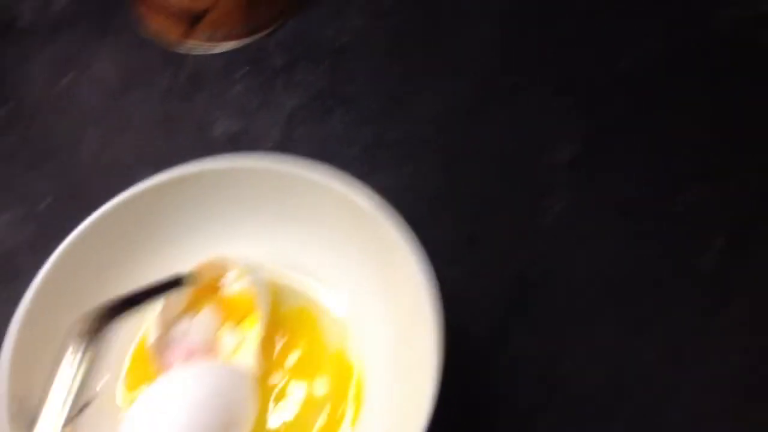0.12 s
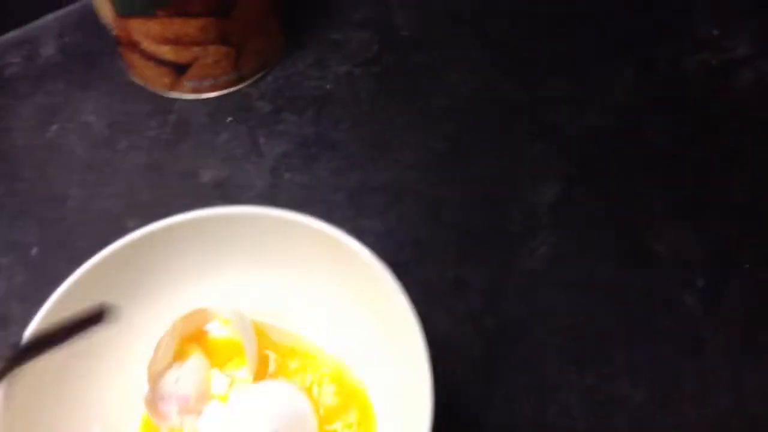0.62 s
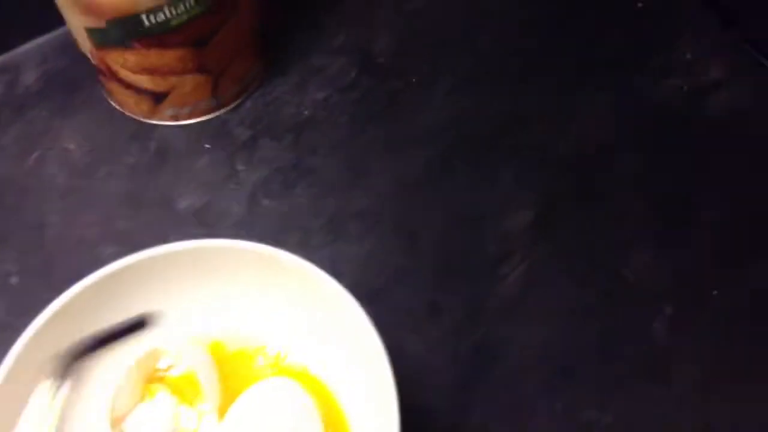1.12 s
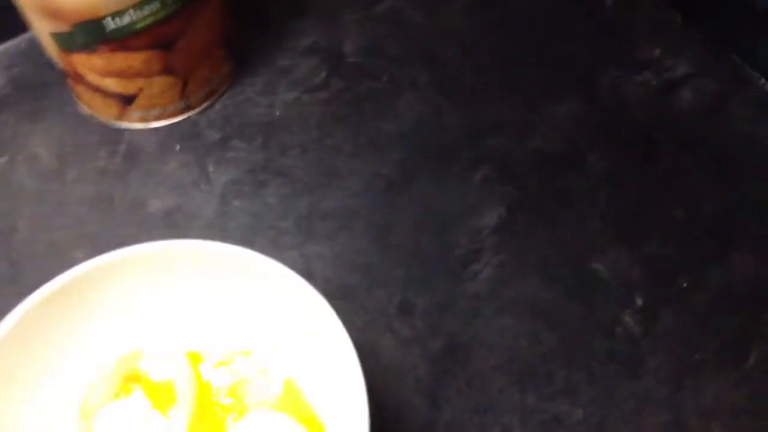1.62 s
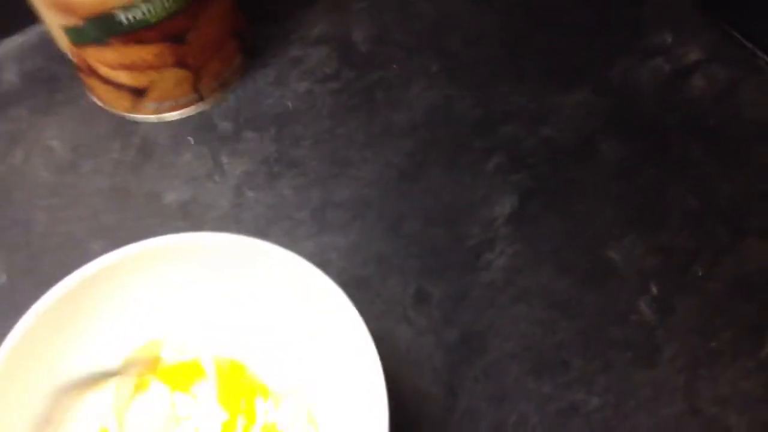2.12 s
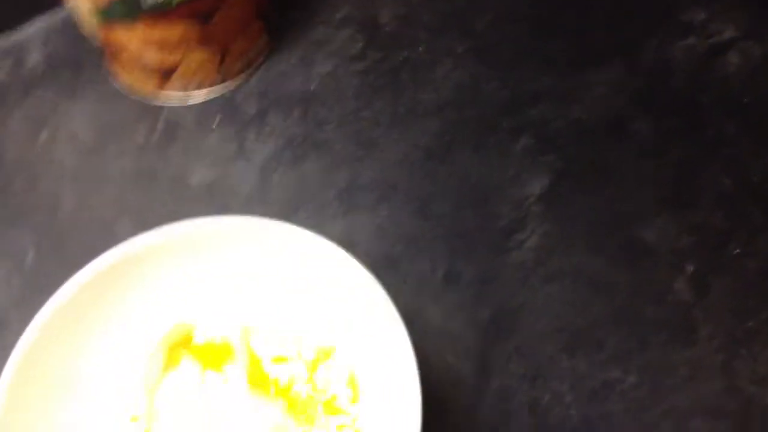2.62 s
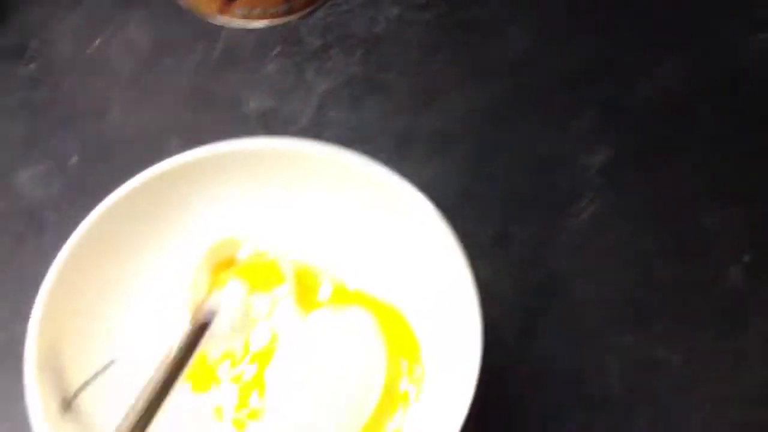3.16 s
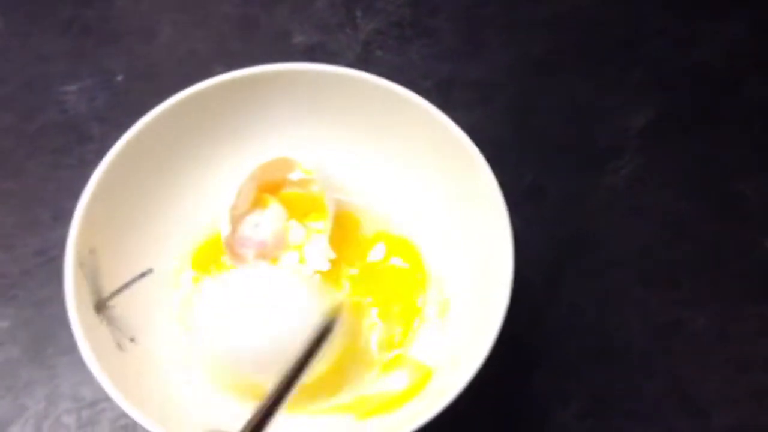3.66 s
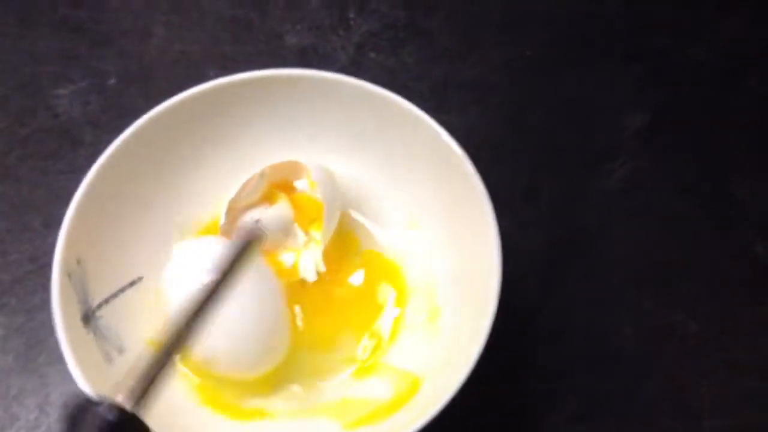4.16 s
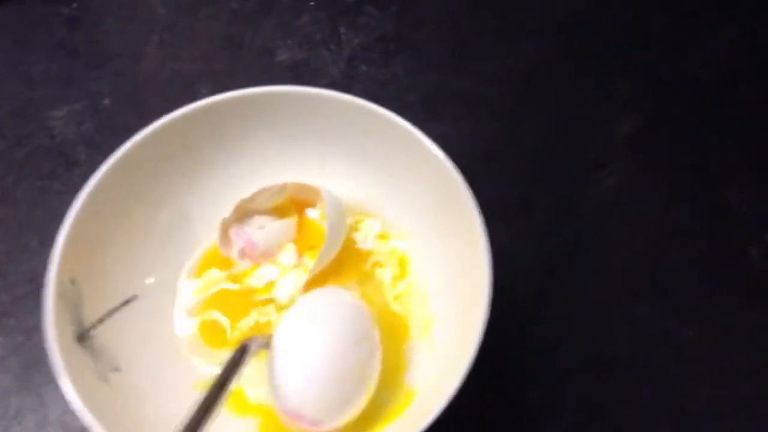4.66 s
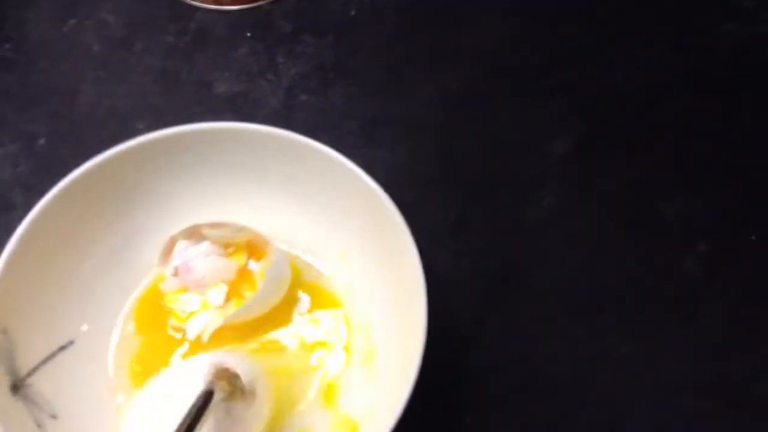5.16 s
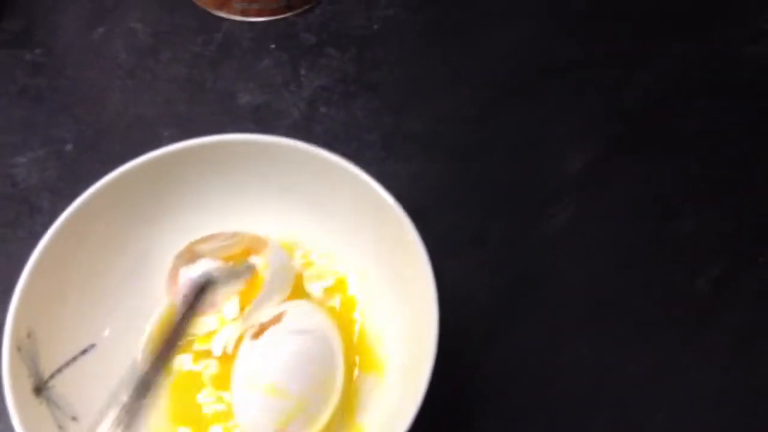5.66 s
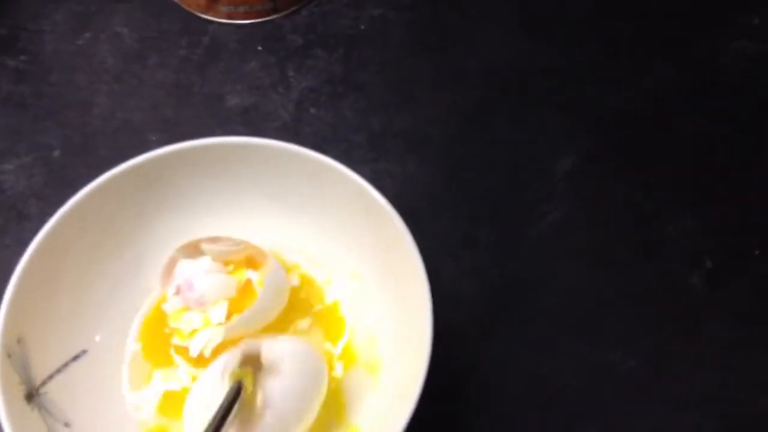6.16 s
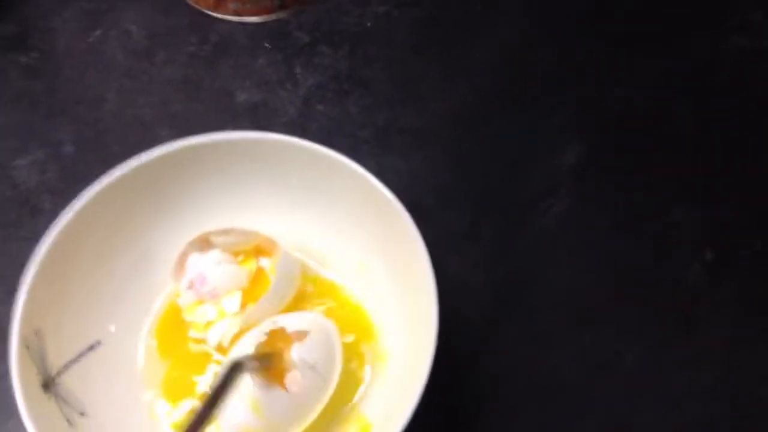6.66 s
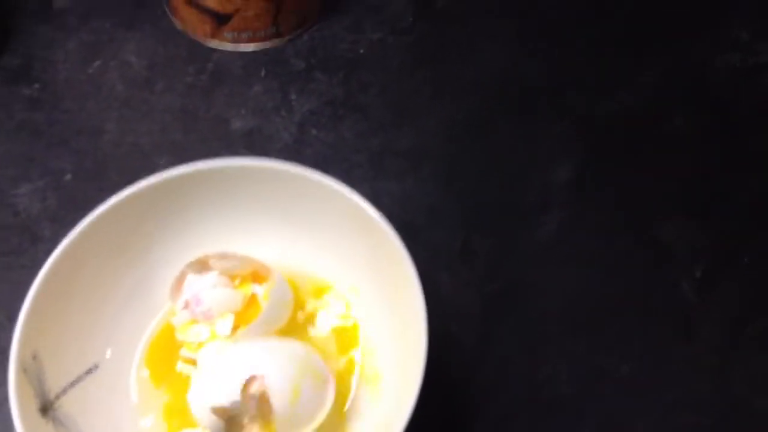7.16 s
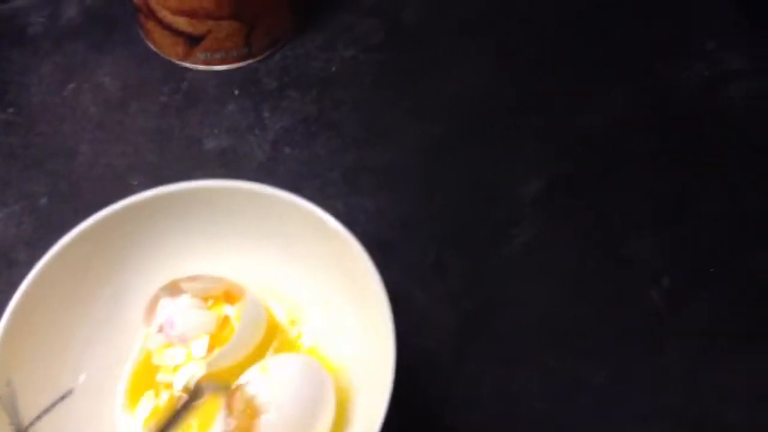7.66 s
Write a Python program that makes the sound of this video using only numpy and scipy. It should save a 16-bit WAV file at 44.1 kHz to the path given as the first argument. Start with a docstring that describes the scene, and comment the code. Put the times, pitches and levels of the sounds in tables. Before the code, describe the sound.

Irregular crisp taps of steel on cracked eggshell, dull ceramic bowl knocks, small wet crackly scrapes and a brief squeak, in a lightly echoing kitchen.

```python
"""Egg jabbed in a ceramic bowl

Kitchen counter, small microphone close to the bowl. A steel tool jabs at an egg: clicks and noise
bursts make the cracks, dying sines the shell, bowl, counter and steel pings, gliding sines the squeaks.
Grainy noise through a moving resonance makes the slides, with a rumble from noise in the counter modes.
Echoes and decaying taps make the hard-walled kitchen, over a steady hush of filtered noise.
"""
import sys
import numpy as np
from scipy import signal
from scipy.fft import rfft, irfft
from scipy.io import wavfile

SR = 44100
rng = np.random.default_rng(int(sys.argv[2]) if len(sys.argv) > 2 else 0)


def wav_record(signal):
    """Record a signal, one row per channel, as 16-bit PCM in the file named by sys.argv[1]."""
    frames = np.transpose(np.atleast_2d(signal))
    bounded = np.clip(frames, -1, 1)
    # unit amplitude maps onto the largest positive 16-bit level
    quanta = np.round(bounded * 32767).astype(np.int16)
    wavfile.write(sys.argv[1], SR, quanta)


def undo_db(level):
    """Turn decibels back into plain size, where 20 dB means ten times bigger."""
    steps = np.asarray(level, float) / 20
    return 10 ** steps


N = 343539  # samples

# Tool on shell: time t/s, crack level/dB, counter thud level re crack/dB, shell pitch f/Hz,
# treble level re crack/dB
JABS = [(0.434, -3, -18.5, 3530, -15), (0.915, -14, -7.5, 3690, -2.5), (.955, -32, -30, 5400, -3.5),
        (1.3, -10, -15, 3400, -7), (1.617, -1, -21.5, 2000, -12), (1.648, -18.5, -21, 3850, -11),
        (1.812, -33, -0.5, 1250, -15), (1.828, -23.5, -33.5, 7360, -18), (1.872, -31, -32, 2820, -25),
        (1.966, -3.5, -23.5, 5190, -13), (2.154, -31.5, -32, 3700, -24), (2.31, -4.5, -21.5, 7240, -14.5),
        (2.344, -20, -15, 3670, -6.5), (2.401, -37, 3.5, 1010, -23), (2.51, -22.5, -10.5, 1070, -21),
        (2.568, -25.5, -23.5, 2050, -36), (2.688, -11, -23, 3330, -7), (3.014, -6.5, -30.5, 1013, -16.5),
        (3.341, -4, -31.5, 996, -11.5), (3.674, -4.5, -33, 2060, -17), (3.834, -26.5, -23.5, 930, -15),
        (4.008, -5.5, -23.5, 3120, -19), (4.039, -34, -33, 3720, -15), (4.163, -27.5, -32, 4740, -3.5),
        (4.188, -27.5, -6.5, 1160, -15.5), (4.634, -8.5, -25.5, 2510, -14.5),
        (5.126, -12.5, -15.5, 2070, -8), (5.158, -22.5, -23, 2000, -2), (5.227, -34.5, -25, 3400, 0),
        (5.27, -34, -35.5, 4500, -19), (5.303, -33.5, -26, 6550, 5.5), (5.435, -6, -19.5, 1220, -12),
        (5.655, -54.5, -30, 7000, 6), (5.799, -10.5, -25, 6640, -0.5), (5.847, -22, -17, 5000, -4),
        (5.993, -35.5, -18.5, 2050, -9), (6.144, -22.5, -16.5, 3330, 3.5), (6.168, -37, -33, 7500, 0),
        (6.179, -28, -26, 4000, -14), (6.271, -41, -30, 1100, 2.5), (6.31, -45, -18, 1160, 11),
        (6.382, -28.5, -26, 3010, -13.5), (6.522, -15, -28, 1720, -4), (6.711, -25.5, -24, 950, -12),
        (6.853, -18.5, -36, 4550, -5), (6.888, -22, -23, 2000, -13), (7.043, -37, -35, 3300, -14),
        (7.22, -32, -52, 4160, -3), (7.266, -38, -5, 6200, -2), (7.285, -10.5, -48, 4810, -6.5),
        (7.293, -27.5, -15.5, 4940, -9.5), (7.373, -27.5, -57, 1930, 3), (7.384, -24.5, -53, 1850, -5.5),
        (7.418, -40.5, -50, 1970, 12), (7.54, -10, -25.5, 2610, -9.5), (7.587, -16, -51, 5520, -17)]
# Egg thrown against the bowl: time t/s, crack level/dB, then levels re crack/dB of
# counter thud, bowl knock, rim ring
KNOCKS = [(2.801, -24, -20, -17, -50.5), (3.058, 2.5, -29.5, -20, -51), (3.546, -52.5, -2, -9, -28),
          (3.723, -3.5, -27.5, -17.5, -49.5), (4.317, -7, -15, -15, -57),
          (4.329, -8.5, -26.5, -28.5, -51.5), (4.665, 2.5, -30.5, -21.5, -54.5),
          (5.492, 3, -29.5, -20.5, -48), (5.859, -8.5, -22, -12, -38), (6.192, -8, -20, -19, -59),
          (6.206, -5.5, -29, -22, -75), (6.574, -4, -23, -16, -46.5), (6.902, -0.5, -24.5, -18.5, -49.5),
          (7.615, 3.5, -28, -20.5, -53)]
# Egg and shell bits slide: start t/s, length t/s, crackle level/dB, rumble level/dB, resonance f/Hz
SLIDES = [(-.01, 0.079, -37, -39.5, 3700), (.05, .085, -35.5, -45, 5460),
          (0.409, 0.059, -57.5, -61.5, 3700), (0.615, 0.035, -42.5, -40, 3740),
          (0.647, 0.042, -39, -43.5, 2000), (0.686, 0.09, -56.5, -45.5, 3800),
          (1.047, 0.56, -64, -77, 3000), (1.816, 0.069, -44, -51, 5300), (2.097, 0.041, -59, -46, 3060),
          (2.358, 0.27, -52.5, -44, 5200), (2.516, 0.039, -38, -31, 4930), (2.56, 0.027, -41, -46, 2400),
          (2.612, 0.017, -49.5, -62.5, 2000), (2.715, .03, -25.5, -51, 5300),
          (2.748, 0.024, -23, -33, 3920), (2.799, 0.042, -44.5, -50, 2800), (3.352, 0.023, -44, -31, 4150),
          (3.386, 0.031, -16, -42, 2790), (3.401, 0.034, -34, -43, 3860), (3.53, 0.038, -56.5, -59.5, 2130),
          (3.854, .1, -45.5, -66, 2100), (4.007, 0.073, -27, -38.5, 3400), (4.199, 0.13, -41, -65, 4200),
          (4.5, 0.15, -51.5, -43, 2150), (5.137, 0.065, -29.5, -30, 6500), (5.23, 0.1, -45, -59, 3500),
          (5.313, 0.085, -40.5, -49, 8100), (5.821, 0.054, -30, -35.5, 5000),
          (5.899, 0.093, -43, -53, 7500), (6.137, 0.087, -30.5, -46, 6540), (6.214, 0.13, -57, -49, 5500),
          (6.543, 0.032, -55, -43, 7200), (6.86, 0.1, -25.5, -34.5, 2410), (6.972, 0.18, -41, -60, 2100),
          (7.23, 0.067, -35.5, -67, 4850), (7.298, 0.05, -51, -59, 4600), (7.379, 0.069, -32, -72, 6540),
          (7.554, 0.035, -36, -60, 4580)]
# Steel tip on the bowl: t/s, level/dB
PINGS = [(3.059, -26.5), (3.724, -27), (4.666, -21), (5.492, -21.5), (5.858, -35), (6.191, -28),
         (6.576, -31.5)]
# Wet squeaks of steel on shell: t/s, level/dB, first f/Hz, last f/Hz, t60/s
SQUEAKS = [(7.373, -10.5, 2090, 1830, 0.031), (7.386, -16.5, 1951, 1680, 0.028),
           (7.399, -32, 1820, 1660, 0.04), (7.419, -24, 2000, 1900, 0.029)]
# Rim ring after a jab, read between points: t/s, level re crack/dB
RIM_REACH = [(.4, -66), (1.3, -45.5), (2, -63), (3.35, -49), (5.1, -57.5), (5.8, -42.5), (6.5, -79),
             (7.5, -61.5)]
# Shell ring after a jab, read between points: t/s, level re crack/dB
SHELL_RING = [(.43, -19), (.9, -10), (1.3, -14.5), (1.62, -24.5), (3.0, -20.5), (7.2, -20), (7.28, -7.5),
              (7.4, -5.5), (7.54, -15.5)]

# Modes of the counter, the yolk-damped bowl, the bowl's rim and the steel tip: f/Hz, level/dB, t60/s
COUNTER_MODES = [(159.4, -0.5, 0.19), (203.6, -2.5, 0.11), (218.3, -7.5, 0.12), (262, -13, 0.25),
                 (313.6, -6.5, 0.099), (341.5, 6.5, 0.062), (392, 1.5, 0.09), (438, -1, 0.18),
                 (480, -17.5, 0.028), (651, -7, 0.052), (727, -15, 0.15)]
DAMPED_BOWL_MODES = [(1050, -20.5, 0.019), (1004, -4, 0.1), (1023, -0.5, 0.096), (1162.5, 9, .035),
                     (1220, -0.5, 0.11), (1309, -3, 0.11), (1250, -2, 0.088), (2000, 13, .012),
                     (3150, 9, 0.012), (3400, -27.5, 0.019), (6750, 1, .01)]
RIM_MODES = [(938, -2, .65), (941, -12, .5), (2053, -1, .65), (2057.5, -8, .5), (3375, -16, .3)]
STEEL_MODES = [(11490, 0, .045), (11620, -6, .02)]

# Spectra of crack, its treble, scraping shell and hush: f/Hz, relative density level/dB per Hz
CRACK_SPECTRUM = [(180, -25.5), (300, -7.5), (1230, 4.5), (1620, -6), (3530, 3), (4530, 0), (7000, -2.5),
                  (9100, -25.5), (15400, -120)]
TREBLE_SPECTRUM = [(4000, -11), (6000, -2.5), (9000, -3), (13000, -5.5), (15500, -17), (18000, -26.5)]
SCRAPE_SPECTRUM = [(410, -24.5), (700, -3.5), (1500, 2), (2100, 4), (2330, 1.5), (9480, -4.5),
                   (14800, -12.5), (16000, -36)]
HUSH_SPECTRUM = [(24, -80), (40, -33.5), (189, 1), (262, -13.5), (733, -14.5), (942, -15), (3380, -19.5),
                 (12800, -27), (14100, -26.5), (16000, -44.5)]

# Near reflections, re the direct sound: delay t/s, level/dB
ECHOES = [(.0011, -25), (.0022, -22), (0.0139, -23.5), (0.021, -32), (.031, -28.5), (0.04, -36.5)]
# Decay of the kitchen by band: f/Hz, t60/s
KITCHEN_DECAY = [(100, 0.14), (300, 0.43), (1000, 0.29), (3000, 0.22), (7000, 0.22), (14000, 0.16)]

BLOW_DELAY_S = 0.0015  # delay from the listed time to the blow
BOUNCE_S, BOUNCE_DB = 0.0088, -15  # the egg lands a second time after a knock
KNOCK_TREBLE_DB = -16  # re crack
SLIDE_RISE_S = 0.01  # fade at either end of a slide
SLIDE_FADE_DB, RUMBLE_FADE_DB = -13.5, -16  # a slide slows: change in level by its end
STUTTER_DB, STUTTER_S = 2.5, 0.015  # rms swing and smoothing window
KITCHEN_DB = -10.5
LATE_DB, LATE_SLOWER = -16.5, 2.6  # the rooms next door die more slowly
HUSH_DB = -70
MIC_LOW_HZ, MIC_TOP_HZ = 130, 15600


def jabs(near, bodies):
    """Steel on shell: each blow excites the cracked shell's short modes."""
    for s, db, thud_db, hz, treble_db in JABS:
        shell = ring(shell_modes(hz), 0.1, spread_db=0, rise=0.0016, chatter=0.15)
        shell_db = np.interp(s, *np.transpose(SHELL_RING))
        rim_db = np.interp(s, *np.transpose(RIM_REACH))
        blow(s, db, thud_db, treble_db, rim_db, undo_db(shell_db) * shell, near, bodies)


def knocks(near, bodies):
    """Egg on bowl: each blow excites the yolk-damped bowl, and the egg then bounces once."""
    for s, db, thud_db, knock_db, rim_db in KNOCKS:
        bowl = ring(DAMPED_BOWL_MODES, 0.2, spread_db=1.5, rise=0.00073, detune=0.0018, chatter=0.14)
        bowl = undo_db(knock_db) * bowl
        blow(s, db, thud_db, KNOCK_TREBLE_DB, rim_db, bowl, near, bodies)
        crack = 0.66 * burst(CRACK_SPECTRUM, snap=0.0015, tail=0.0013, tail_db=-18, click_db=0.5)
        add(near, s + BLOW_DELAY_S + BOUNCE_S, undo_db(db + BOUNCE_DB) * (crack + bowl[:4096]))


def blow(s, db, thud_db, treble_db, rim_db, body, near, bodies):
    """Crack and body go to the air; counter and rim ring on by themselves."""
    s = s + BLOW_DELAY_S
    crack = burst(CRACK_SPECTRUM, snap=0.00065, tail=0.0051, tail_db=-11, click_db=8.5)
    treble = burst(TREBLE_SPECTRUM, snap=0.00043, tail=0.0066, tail_db=-10, click_db=0)
    thud = ring(COUNTER_MODES, 0.54, spread_db=2.5, rise=0.0044, detune=0.016, chatter=0.031)
    rim = ring(RIM_MODES, 0.93, spread_db=0, rise=0.011)
    add(near, s, undo_db(db) * 0.41 * crack)
    add(near, s, undo_db(db + treble_db) * 2.67 * treble)
    add(near, s, undo_db(db) * body)
    add(bodies, s, undo_db(db + thud_db) * thud)
    add(bodies, s, undo_db(db + rim_db) * rim)


def shell_modes(hz, count=5):
    """A cracked shell has a cluster of close, short modes, and a hollow note near 3.5 kHz."""
    steps = np.linspace(-1, 1, num=count) + 0.11 * rng.standard_normal((2, count))
    cluster = [(f, 0, 0.008) for f in hz * (1 + 0.07 * steps[0])]
    hollow = [(f, -15, 0.01) for f in 3450 * (1 + 0.09 * steps[1])]
    return cluster + hollow


def burst(spectrum, snap, tail, tail_db, click_db):
    """A clean click, a snap of noise and a short crumble; snap and tail are 1/e times in s."""
    t = np.arange(4096) / SR
    shape = np.exp(-t / snap) + undo_db(tail_db) * np.exp(-t / tail)
    shape = shape * np.minimum(t / 0.00023, 1)
    noise = evened(coloured(rng.standard_normal(len(t)), spectrum))
    return undo_db(click_db) * click(spectrum) + noise * shape


def click(spectrum):
    """The shortest causal pulse with this spectrum, peak 1: minimum phase by the folded cepstrum."""
    db = np.maximum(read(spectrum, np.fft.rfftfreq(4096, 1 / SR)), -50)
    cepstrum = irfft(np.log(undo_db(db)))
    cepstrum[1:2048] *= 2
    cepstrum[2049:] = 0
    pulse = irfft(np.exp(rfft(cepstrum)))
    return pulse / abs(pulse).max()


def ring(modes, seconds, spread_db, rise, detune=0.0, chatter=0.0):
    """Dying sines; each blow sets signs and may vary strengths and pitches and chatter a little."""
    hz, db, t60 = np.transpose(modes)[:, :, None]
    t = np.arange(round(seconds * SR)) / SR
    draw = rng.standard_normal((3, len(modes), 1))  # for sign, strength and pitch
    sines = np.sin(2 * np.pi * hz * (1 + detune * draw[2]) * t)
    strength = np.sign(draw[0]) * undo_db(db + spread_db * draw[1] - 60 * t / t60)
    rung = (strength * sines).sum(0) * (1 - np.exp(-t / rise))
    contact = chatter * rng.standard_normal(900) * np.exp(-np.arange(900) / SR / 0.0042)
    contact[0] = 1
    return evened(signal.oaconvolve(rung, contact), count=600)


def pings(near):
    """The steel tip meets the bowl and rings high and short."""
    for s, db in PINGS:
        add(near, s, undo_db(db) * ring(STEEL_MODES, 0.2, spread_db=1.5, rise=0.00043))


def squeaks(near):
    """Wet steel on shell: a dying sine whose pitch sags as the tip slows."""
    t = np.arange(3000) / SR
    for s, db, first_hz, last_hz, t60 in SQUEAKS:
        hz = last_hz + (first_hz - last_hz) * np.exp(-t / 0.015)
        tone = np.sin(2 * np.pi * np.cumsum(hz) / SR)
        add(near, s, undo_db(db - 60 * t / t60) * np.minimum(t / 0.0035, 1) * tone)


def slides():
    """Wet shell bits crackle through a moving resonance; the rolling egg shakes the counter modes."""
    t = np.arange(N) / SR
    # the wet grip catches and lets go
    swing = signal.oaconvolve(rng.standard_normal(N), np.hanning(STUTTER_S * SR), "same")
    stutter = undo_db(STUTTER_DB * evened(swing))
    crackle_gain, rumble_gain = np.zeros((2, N))
    for s, length, crackle_db, rumble_db, _ in SLIDES:
        done = (t - s) / length
        moving = np.clip(np.minimum(t - s, s + length - t) / SLIDE_RISE_S, 0, 1)
        crackle_gain += moving * undo_db(crackle_db + SLIDE_FADE_DB * done ** 2)
        rumble_gain += moving * undo_db(rumble_db + RUMBLE_FADE_DB * done ** 2)
    shorter = [(hz, db, t60 * 0.72) for hz, db, t60 in COUNTER_MODES]
    counter = ring(shorter, 0.3, spread_db=2, rise=0.0038)
    shaking = rng.standard_normal(N) * rumble_gain * stutter
    rumble = signal.oaconvolve(shaking, counter / np.linalg.norm(counter))[:N]
    return scraping() * crackle_gain * stutter, rumble


def scraping(grains_per_s=2500, grain_db=2.5, hiss=0.7, peak_db=9, peak_octaves=0.12):
    """Random grains and hiss, boosted around the pitch of the slide that started last."""
    sizes = undo_db(grain_db * np.minimum(rng.exponential(1, N), 5))
    grains = (rng.random(N) < grains_per_s / SR) * sizes * rng.standard_normal(N)
    rough = coloured(evened(grains) + hiss * rng.standard_normal(N), SCRAPE_SPECTRUM)
    start, _, _, _, peak_hz = np.transpose(SLIDES)
    hz, frame_s, z = signal.stft(rough, SR, nperseg=256)
    latest = np.maximum(np.searchsorted(start, frame_s) - 1, 0)
    off = np.log2((hz[:, None] + 1) / peak_hz[latest]) / peak_octaves
    boosted = z * undo_db(peak_db * np.exp(-off ** 2))
    return evened(signal.istft(boosted, SR, nperseg=256)[1][:N])


def kitchen(x):
    """A few near echoes, then sparse taps whose bands die at their own speeds."""
    early = np.zeros(SR // 10)
    early[0] = 1  # direct sound
    for s, db in ECHOES:
        early[round(s * SR)] = undo_db(db)
    out = signal.oaconvolve(x, early)[:N]
    # three tails take turns, so the reverberation varies from blow to blow
    for k in range(3):
        turn = np.sqrt(2 / 3) * np.cos(2 * np.pi * (1.3 * np.arange(N) / SR + k / 3))
        out += undo_db(KITCHEN_DB) * signal.oaconvolve(x * turn, kitchen_tail())[:N]
    return out


def kitchen_tail():
    """Random-sign taps, one in every ten samples, with a fast and a slow decay in each band."""
    at = np.arange(100, SR // 2, 10)
    taps = np.zeros(SR // 2 + 10)
    signs = rng.choice([-1.0, 1.0], len(at))
    taps[at + rng.integers(0, 10, len(at))] = signs * (1 - np.exp(-at / SR / 0.0014))
    hz, t, z = signal.stft(taps, SR, nperseg=256)
    fall_db = -60 * t / read(KITCHEN_DECAY, hz)[:, None]
    decay = undo_db(fall_db) + undo_db(LATE_DB + fall_db / LATE_SLOWER)
    tail = signal.istft(z * decay, SR, nperseg=256)[1]
    return tail / np.linalg.norm(tail)


def hush():
    """The steady air and electronics noise."""
    return undo_db(HUSH_DB) * evened(coloured(rng.standard_normal(N), HUSH_SPECTRUM))


def read(points, hz):
    """A table of (f/Hz, value) read on a log axis."""
    f, value = np.transpose(points)
    return np.interp(np.log(hz + 1), np.log(f + 1), value)


def evened(x, count=None):
    """Rms 1 over the first samples, or over all."""
    return x / np.sqrt(np.mean(x[:count] ** 2) + 1e-20)


def coloured(x, spectrum):
    """Filters x by a spectrum in dB."""
    gain = undo_db(read(spectrum, np.fft.rfftfreq(len(x), 1 / SR)))
    return irfft(rfft(x) * gain, len(x))


def add(mix, s, sound):
    """Mixes a sound in at s seconds."""
    part = mix[round(s * SR):][:len(sound)]
    part += sound[:len(part)]


def scene():
    """Blows, pings, squeaks and slides in the kitchen, over the hush."""
    near, bodies = np.zeros((2, N))
    jabs(near, bodies)
    knocks(near, bodies)
    pings(near)
    squeaks(near)
    crackle, rumble = slides()
    in_room = kitchen(near + 0.38 * crackle + 0.67 * bodies)
    return (in_room + 0.37 * bodies + rumble + hush())[None]


def low_pass(x):
    """Removes everything above the highest recorded frequency."""
    return signal.sosfilt(signal.butter(12, 16530, fs=SR, output="sos"), x)


def record(dry):
    """The small, close microphone loses bass and top, and its peaks saturate softly."""
    bass_cut = signal.butter(2, MIC_LOW_HZ, "high", fs=SR, output="sos")
    x = signal.sosfilt(bass_cut, dry)
    x = signal.oaconvolve(x, signal.firwin(255, MIC_TOP_HZ, fs=SR)[None], "same")
    ceiling = 0.7  # of full scale
    mix = ceiling * np.tanh(x / ceiling)
    return low_pass(mix)


dry = scene()
out = record(dry)
wav_record(out)
```